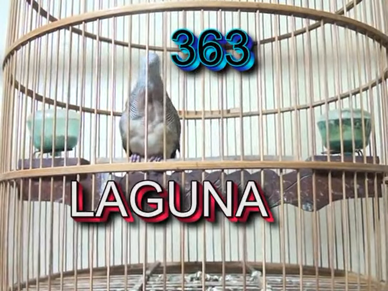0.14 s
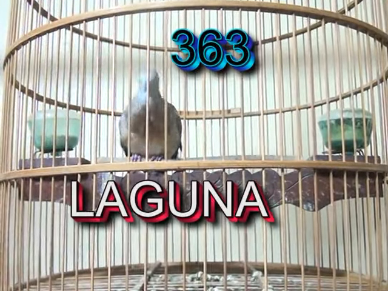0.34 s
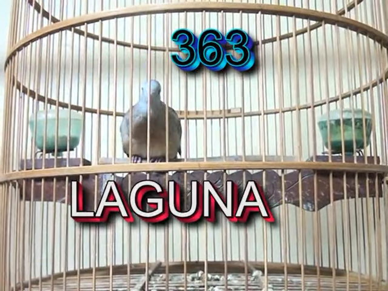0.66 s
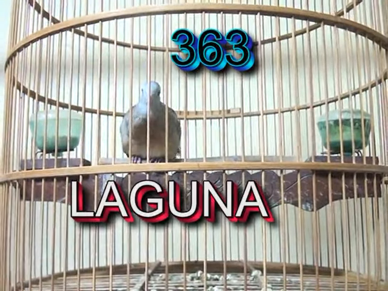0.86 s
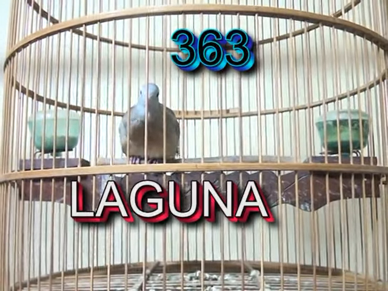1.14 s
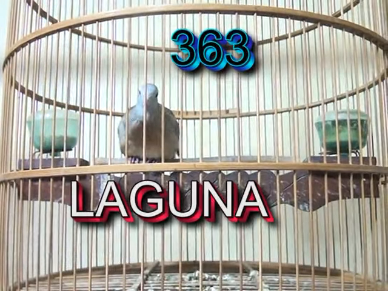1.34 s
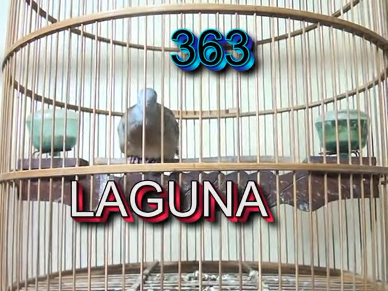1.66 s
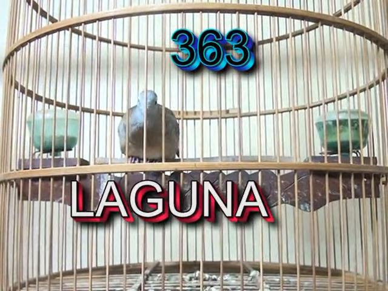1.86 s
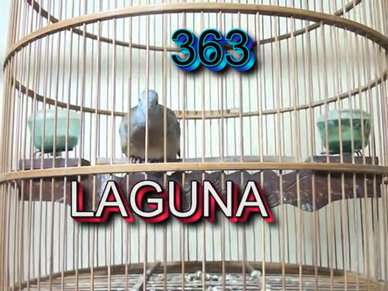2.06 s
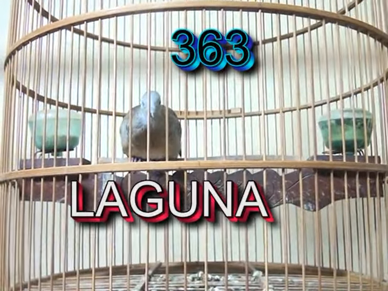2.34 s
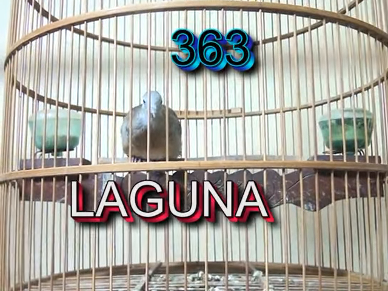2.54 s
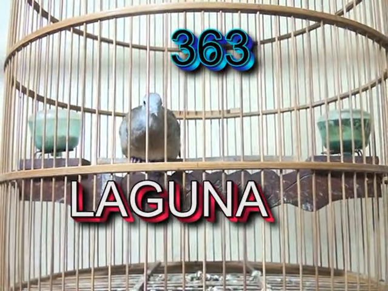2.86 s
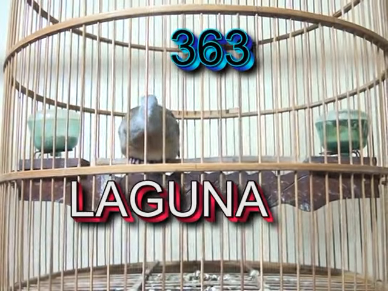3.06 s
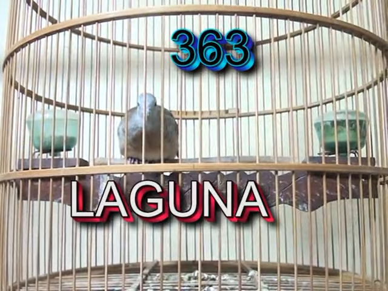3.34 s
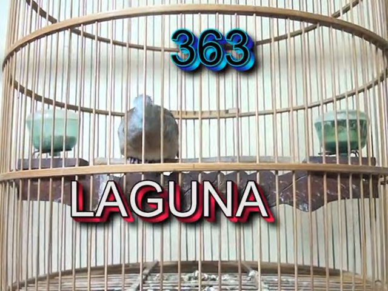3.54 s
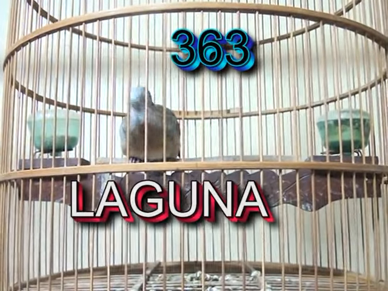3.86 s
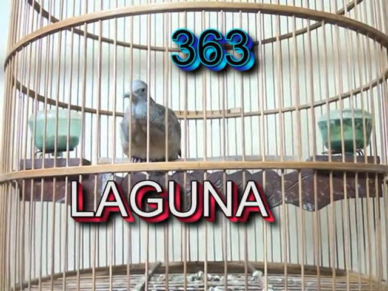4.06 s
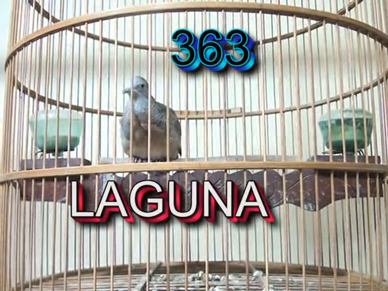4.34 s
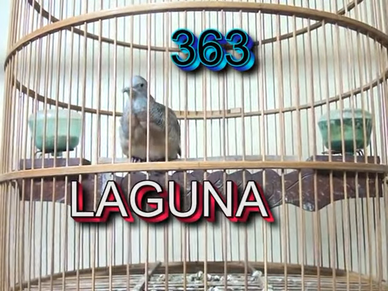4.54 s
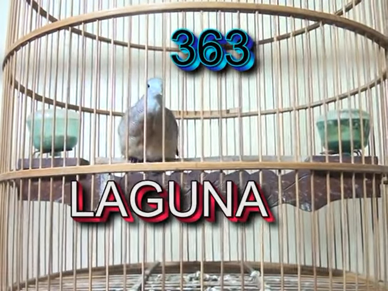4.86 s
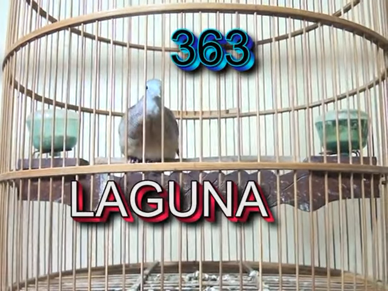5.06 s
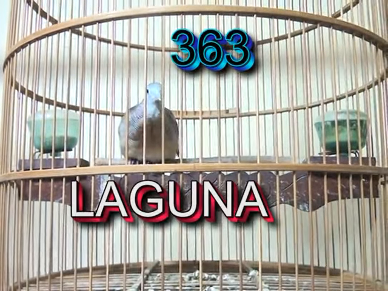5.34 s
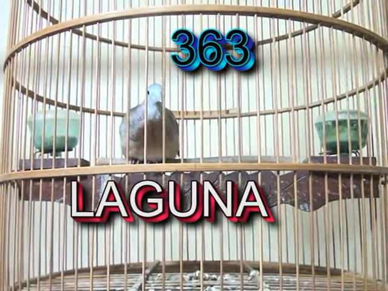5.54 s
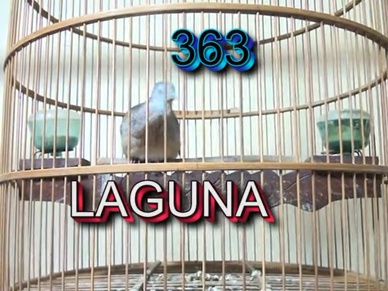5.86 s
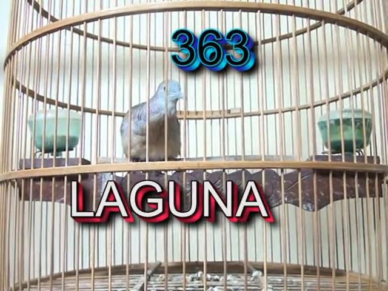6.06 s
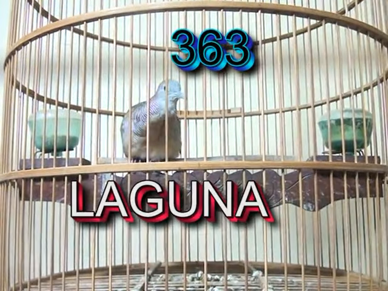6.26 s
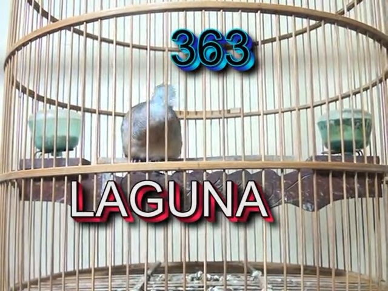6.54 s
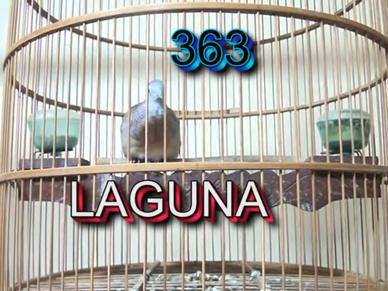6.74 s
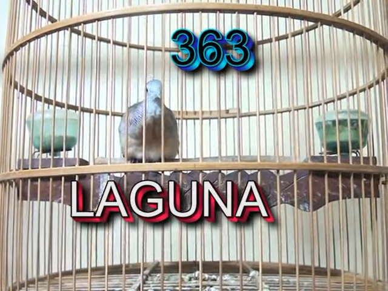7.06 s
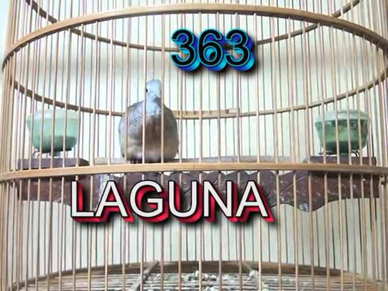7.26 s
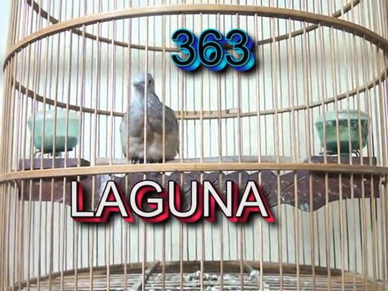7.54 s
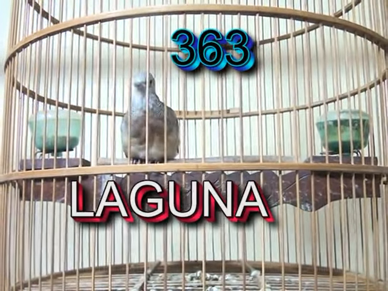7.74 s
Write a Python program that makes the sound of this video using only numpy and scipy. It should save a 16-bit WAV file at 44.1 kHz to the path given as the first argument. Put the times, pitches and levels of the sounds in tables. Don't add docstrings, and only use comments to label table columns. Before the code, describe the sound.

A small dove calls close to the microphone on a hard-walled porch. One note sweeps up and falls back, then seventeen short, round, nearly pure coos follow at a steady pace, slowing slightly and softening. A longer, weaker coo and a tiny cluck end it. Walls add quick echoes; behind are faint distant doves, low traffic rumble and a very faint high whine.

```python
import sys
import numpy as np
from scipy import signal
from scipy.fft import rfft, irfft, next_fast_len
from scipy.io import wavfile
from scipy.ndimage import uniform_filter1d, map_coordinates

SR = 44100
rng = np.random.default_rng(int(sys.argv[2]) if len(sys.argv) > 2 else 0)


def invert_db(x):
    u = np.asarray(x, float) / 20
    return 10 ** u


def wrap_up_sound(samples):
    columns = np.atleast_2d(samples).T
    tamed = np.clip(columns, -1, 1)
    steps = np.round(tamed * 32767).astype(np.int16)
    wavfile.write(sys.argv[1], SR, steps)


N = 348081

# time_s, pitch_hz, level_db
FIRST_NOTE = [
    (.457, 780, -21),
    (.465, 808, -17),
    (.5, 827.5, -12.5),
    (.535, 901, -11.5),
    (.558, 953, -12.5),
    (.572, 1077, -12.5),
    (.602, 1143, -13.5),
    (.662, 921.6, -12.5),
    (.68, 775, -22),
]
# start_s, length_s, top_pitch_hz, strength_db
SHORT_COOS = [(0.982, 0.066, 895.5, -8.5), (1.252, 0.077, 900.7, -8), (1.513, .079, 919, -7),
              (1.784, 0.086, 923, -6.5), (2.056, 0.091, 898, -7), (2.325, 0.089, 905.2, -7.5),
              (2.596, 0.1, 889.7, -7.5), (2.887, 0.1, 880, -7.5), (3.161, .099, 877, -7.5),
              (3.468, 0.1, 874.2, -7.5), (3.772, 0.11, 857.8, -8), (4.083, 0.11, 845, -8.5),
              (4.422, 0.11, 844, -9), (4.729, 0.12, 842, -10), (5.098, .14, 827.5, -9.5),
              (5.531, 0.13, 827.5, -10.5), (5.879, 0.13, 826, -12)]
# time_s, pitch_hz, level_db
LAST_NOTE = [
    (6.323, 790, -25.5),
    (6.331, 790, -17.5),
    (6.353, 811, -16.5),
    (6.393, 822, -13),
    (6.457, 810, -16.5),
    (6.52, 820, -18.5),
    (6.59, 828.6, -20),
    (6.66, 831.3, -18.5),
    (6.72, 874.5, -24),
]
# time_s, pitch_hz, level_db
CLUCK_NOTE = [
    (6.902, 877, -34.5),
    (6.908, 854, -23),
    (6.946, 836.5, -19),
    (6.953, 880, -30.5),
]
# pitch_hz, gain_db
NECK_PASS = [(760, -11), (830, -2.5), (865, 0), (885, -2), (900, -5), (920, -8.5)]
# partial_hz, level_db
SECOND_PARTIAL = [(1560, -38), (1660, -37.5), (1730, -43), (1800, -48), (1890, -38), (2100, -39),
                  (2270, -35)]
# partial_hz, level_db
THIRD_PARTIAL = [(2330, -47.5), (2470, -51.5), (2600, -47), (2700, -43), (2830, -38), (3100, -41.5),
                 (3400, -39.5)]
# partial_hz, gain_db
THROAT_PASS = [(2400, 5.5), (3300, -9), (4300, -13.5), (5200, -16.5), (5800, -13), (6250, -6.5),
               (6650, -10), (7000, -21.5), (9000, -30.5), (13000, -27.5)]
# top_pitch_hz, level_db
BRIGHTNESS = [(825, -53.5), (860, -51.5), (900, -44.5), (930, -43.5)]
# centre_hz, width_hz
AIR_SAC = (874, 510)
# freq_hz, density_db_per_hz
BREATH_SPECTRUM = [(600, -31), (1000, -5.5), (1350, 2.5), (2000, -10), (3500, -16.5), (6200, -16.5),
                   (9000, -17.5), (14000, -21.5)]
# time_s, spread_s, level_db
FEATHERS = (2.47, .04, -54)
# delay_ms, level_db
LEFT_ECHOES = [(-0.02, 1.5), (3.8, -25.6), (12.37, -12.8), (15.04, -27.9), (26.33, -34.1), (28.93, -20.1),
               (37.45, -23.6), (44.58, -18.1), (49.46, -28.6), (52.69, -21.0), (61.92, -14.6),
               (64.01, -30.3), (75.17, -22.1), (86.36, -30.8), (89.64, -25.6), (96.47, -28.5),
               (106.4, -20.5), (113.11, -32.0), (123.38, -33.8), (138.39, -25.9), (150.45, -31.8),
               (169.62, -31.6), (201.36, -34.1)]
# delay_ms, level_db
RIGHT_ECHOES = [(0.05, -0.2), (3.75, -18.8), (7.01, -12.8), (10.27, -23.2), (19.06, -25.8), (21.71, -16.2),
                (31.54, -18.5), (47.24, -29.3), (49.32, -15.5), (55.06, -18.3), (60.77, -11.8),
                (64.07, -21.4), (71.78, -24.7), (78.79, -17.8), (90.25, -22.6), (112.35, -28.7),
                (125.71, -27.7), (137.11, -22.6), (150.52, -27.9), (168.42, -28.4), (177.9, -32.6),
                (186.5, -30.5), (200.19, -31.7)]
# freq_hz, t60_s
PORCH_DECAY = [(500, 0.36), (1500, 0.65), (4000, 0.26), (10000, 0.14)]
# freq_hz, gain_db
TAIL_COLOUR = [(680, -1), (760, -2), (900, -2), (970, 6.5), (1700, 1.5), (2700, 8), (4000, -1),
               (9000, -4.5)]
# start_s, length_s, pitch_hz, glide_hz, level_db
FAR_CALLS = [(4.308, .11, 733, 5, -49), (4.497, 0.097, 721, -1.5, -44), (4.77, .2, 704, 14.5, -45.5),
             (5.04, .23, 720, -6.5, -40), (5.46, .4, 717, -31.5, -46.5), (7.09, 0.2, 681, -6, -55),
             (0.011, .055, 1250, -22, -51.5), (.26, .16, 831, 8, -57), (5.393, .11, 1336, -130, -63.5),
             (6.15, .1, 1210, 2, -51.5), (7.05, .4, 1169, -8, -64), (7.54, .08, 1246, -2, -52),
             (6.817, 0.051, 1132, -70, -37.5), (6.855, 0.048, 1064, -120, -31)]
# start_s, length_s, drone_hz, glide_hz, level_db
ENGINE_DRONES = [
    (.05, 0.33, 73.3, 1.5, -45.5),
    (.5, 0.63, 75, 2.5, -54),
    (2.95, 0.97, 57.16, 4.5, -48.5),
    (3.95, 0.66, 60.06, 0, -50),
    (3.75, 0.51, 80.7, 1.5, -53),
    (5.1, 0.48, 81, -2.5, -53),
    (5.85, .3, 100.7, 6.5, -55),
    (6, 0.4, 80.6, 1, -51),
    (7.55, 0.22, 58.2, 0, -48),
]
# time_s, level_db
TRAFFIC_SWELL = [
    (0.0, -56),
    (0.46, -54),
    (5.01, -56),
    (5.73, -51.5),
    (7.89, -58.5),
]
# freq_hz, density_db_per_hz
RUMBLE_SPECTRUM = [(12, -30.5), (22, 2.5), (33, -2.5), (42, -2), (59, 1), (75, -7.5), (100, -5.5),
                   (130, -12.5), (200, -21.5), (440, -120)]
# freq_hz, density_db_per_hz
AIR_SPECTRUM = [(65, -31.5), (110, -12), (289, -3), (370, -8.5), (410, -4), (606, -7.5), (686, -6),
                (730, -5.5), (1270, -7.5), (1660, -11.5), (2170, -13), (6320, -26.5), (15000, -26.5)]
# freq_hz, left_right_likeness
LIKENESS = [(30, .8), (70, .85), (140, .5), (280, .65), (900, .45), (2400, .45), (6500, .4), (6900, .9),
            (15000, .95)]
# freq_hz, level_db_rms
LINE_SCAN = [(11698, -80), (15125, -77), (15475, -80), (15525, -72), (15575, -71), (15625, -62),
             (15675, -72), (15725, -78)]


def unit(x):
    return x / np.sqrt(np.mean(x ** 2) + 1e-20)


def along(points, hz):
    f, v = np.transpose(points)
    return np.interp(np.log(hz + 1), np.log(f + 1), v)


def wobble(rate_hz, size):
    knots = rng.standard_normal(int(max(size, SR // 2) * rate_hz / SR) + 4)
    return map_coordinates(knots, [np.arange(size) * rate_hz / SR])


def note(rows, fade_s):
    s, *cols = np.transpose(rows)
    t = np.arange(s[0] - fade_s, s[-1] + fade_s, 1 / SR)
    edge_s = np.minimum(t - t[0], t[-1] - t)
    gate = np.sin(np.pi / 2 * np.clip(edge_s / (2 * fade_s), 0, 1)) ** 2
    return max(round(t[0] * SR), 0), gate, [np.interp(t, s, c) for c in cols]


def near_dove():
    out, effort = np.zeros(N + SR), np.zeros(N + SR)
    run = [(coo(*row), along(BRIGHTNESS, row[2])) for row in SHORT_COOS]
    notes = [(FIRST_NOTE, -47), *run, (LAST_NOTE, -53), (CLUCK_NOTE, -59.5)]
    for count, (rows, bright_db) in enumerate(notes):
        start, gate, (hz, db) = note(rows, fade_s=0.003)
        tone, push_db, strain = membrane(hz, db, bright_db, count)
        out[start:][:len(tone)] += np.sqrt(2) * gate * tone
        effort[start:][:len(tone)] = gate * invert_db(push_db + 1.5 * strain)

        run_up_s = .03 if count == 0 else 0.018 * np.exp(0.064 * rng.standard_normal())
        slaps = run_up(hz[0], run_up_s)
        fade_out = np.clip(np.arange(len(slaps))[::-1] / (.002 * SR), 0, 1)
        slaps *= invert_db(-18.5) * fade_out * (rows is not CLUCK_NOTE)
        out[start + SR // 300 - len(slaps):][:len(slaps)] += slaps
    air = breath()
    riding = invert_db(-0.5) * effort[:N] * unit(air)
    return out[:N] + (riding + rustle(air)) * invert_db(1.9 * wobble(70, N))


def coo(start_s, length_s, top_hz, strength_db):
    t = np.linspace(0, length_s, num=80)
    knee_hz, settle_s, fall_to_hz = 826, .018, 794.7
    low_hz = 784 - .4 * (top_hz - knee_hz)
    fall_s = .011 + .12 * length_s
    climb = np.clip(t / (length_s - fall_s), 0, 1)
    fall = np.clip(1 - (length_s - t) / fall_s, 0, 1) ** 1.9
    hz = knee_hz - (knee_hz - low_hz) * np.exp(-t / settle_s)
    hz += (top_hz - knee_hz) * climb - (top_hz - fall_to_hz) * fall

    attack_db = 5 * np.exp(-t / 0.0017)
    release_db = 8 * np.exp((t - length_s) / .004)
    spent_db = 1 * max(top_hz - 913, 0) * fall
    db = strength_db + along(NECK_PASS, hz) - (attack_db + release_db) - spent_db
    return np.transpose([start_s + t, hz, db])


def membrane(hz, db, bright_db, count):
    size = len(hz)
    phase = 2 * np.pi * np.cumsum(hz * (1 + .0004 * wobble(60, size))) / SR
    strain = np.clip((hz - 920) / 150, 0, 1)
    flutter = 1 + .45 * strain * wobble(400, size)
    sway = 1 + .36 * strain * wobble(160, size)
    tone = invert_db(db) * (1 + invert_db(-43.5) * wobble(900, size)) * sway * np.sin(phase)

    swell_db = 0.42 * (db - np.max(db))
    second_db = along(SECOND_PARTIAL, 2 * hz) + swell_db
    third_db = along(THIRD_PARTIAL, 3 * hz) + swell_db + 0.42 * (np.max(db) + 9.5)
    tone += flutter * invert_db(second_db) * np.sin(2 * phase + 1)
    tone += flutter * invert_db(third_db) * np.sin(3 * phase + 2)

    opening_db = (1 + 0.49 * count) * np.exp(-np.arange(size) / SR / 0.025)
    push_db = bright_db + 0.58 * (db - np.max(db)) + opening_db + 3 * strain
    shake = .11 * strain * wobble(250, size)
    for k in range(4, 15):
        rough = (flutter + .35 * wobble(350, size)) * invert_db(2.9 * wobble(50, size))
        level_db = push_db + strain * (25.5 - 5.1 * k) + along(THROAT_PASS, k * hz)
        tone += rough * invert_db(level_db) * np.sin(k * (phase + shake) + k)
    return tone, push_db, strain


def run_up(pitch_hz, length_s):
    u = np.linspace(0, 1, round(length_s * SR))
    hz = (105 + (pitch_hz - 105) * u ** 4) * (1 + 0.092 * wobble(300, len(u)))
    phase = 2 * np.pi * np.cumsum(hz) / SR
    slaps = np.zeros(len(u))
    for k in range(1, 20):
        slaps += air_sac(k * hz) * hz / pitch_hz * np.sin(k * (phase - phase[-1]))
    return slaps * np.clip(u * 8, 0, 1) * invert_db(-8 * (1 - u))


def air_sac(hz):
    centre_hz, width_hz = AIR_SAC
    damping = (hz * width_hz) ** 2
    return damping / ((centre_hz ** 2 - hz ** 2) ** 2 + damping) / (1 + (hz / 1600) ** 8)


def breath():
    m = next_fast_len(N)
    gain = invert_db(along(BREATH_SPECTRUM, np.fft.rfftfreq(m, 1 / SR)))
    return irfft(rfft(rng.standard_normal(m)) * gain, m)[:N]


def rustle(air):
    time_s, spread_s, level_db = FEATHERS
    burst = np.exp(-((np.arange(N) / SR - time_s) / spread_s) ** 2)
    return invert_db(level_db) * burst * unit(np.diff(air, prepend=0))


def porch(x, diffuse_db):
    hz, t, z = signal.stft(rng.standard_normal((2, SR // 2)), SR, nperseg=512)
    decay_db = 60 * t / along(PORCH_DECAY, hz)[:, None]
    tail = signal.istft(z * invert_db(along(TAIL_COLOUR, hz)[:, None] - decay_db), SR, nperseg=512)[1]
    tail = tail * (1 - np.exp(-np.arange(tail.shape[1]) / SR / .03))
    response = invert_db(diffuse_db) * tail / np.linalg.norm(tail, axis=1, keepdims=True)
    dull = np.hanning(9) / 4
    for side, (direct, *echoes) in enumerate((LEFT_ECHOES, RIGHT_ECHOES)):
        direct_ms, direct_db = direct
        response[side, 1 + int(direct_ms * SR / 1000)] += invert_db(direct_db)
        for delay_ms, level_db in echoes:
            response[side, round(delay_ms * SR / 1000) - 3:][:9] += invert_db(level_db) * dull
    return signal.fftconvolve(x[None], response, axes=1)[:, 1:N + 1]


def far_doves():
    return glides(FAR_CALLS, fade_s=.018, sag_db=2.5)


def glides(calls, fade_s, sag_db):
    out = np.zeros(N + SR)
    for start_s, length_s, pitch_hz, glide_hz, level_db in calls:
        begin = (start_s, pitch_hz, level_db)
        end = (start_s + length_s, pitch_hz + glide_hz, level_db - sag_db)
        start, gate, (hz, db) = note([begin, end], fade_s)
        level = np.sqrt(2) * gate * invert_db(db + 1.4 * wobble(21, len(hz)))
        out[start:][:len(hz)] += level * np.sin(2 * np.pi * np.cumsum(hz) / SR)
    return out[:N]


def street():
    s, db = np.transpose(TRAFFIC_SWELL)
    swell = invert_db(np.interp(np.arange(N) / SR, s, db) + 7.5 + 0.93 * wobble(4.1, N))
    drones = glides(ENGINE_DRONES, fade_s=.05, sag_db=1.5)
    drift_db = .4 * wobble(1.5, N)
    wash = rush(AIR_SPECTRUM, patchy_db=.8)
    rumble = rush(RUMBLE_SPECTRUM, patchy_db=.9)
    return swell * rumble + drones + invert_db(-46 + drift_db) * wash


def rush(spectrum, patchy_db):
    z = signal.stft(rng.standard_normal((2, N + SR // 2)), nperseg=512)[2]
    field = uniform_filter1d(rng.standard_normal(z.shape[1:]), 5, 0)
    field = uniform_filter1d(field, 12, 1)
    pair = signal.istft(z * invert_db(patchy_db * unit(field)), nperseg=512)[1]
    m = next_fast_len(pair.shape[1])
    hz = np.fft.rfftfreq(m, 1 / SR)
    turn = np.arccos(np.clip(along(LIKENESS, hz), -1, 1)) / 2
    shaped = rfft(pair, m) * invert_db(along(spectrum, hz))
    mid, side = irfft(shaped * [np.cos(turn), np.sin(turn)], m)[:, :N]
    return unit(np.array([mid + side, mid - side]))


def whistle():
    t = np.arange(N) / SR
    out = np.zeros(N)
    for hz, db in LINE_SCAN:
        level = np.sqrt(2) * invert_db(db + 1.8 * wobble(14, N))
        out += level * np.cos(2 * np.pi * hz * t + .4 * wobble(9, N))
    return out


def scene():
    return porch(near_dove(), diffuse_db=-15.5) + porch(far_doves(), diffuse_db=-11) + street()


def band_limit(x):
    return signal.sosfilt(signal.butter(12, 16790, fs=SR, output="sos"), x)


def record(dry):
    top_hz, wide_hz, narrow_db = 15790, 6900, -8
    m = next_fast_len(N)
    hz = np.fft.rfftfreq(m, 1 / SR)
    left, right = rfft(dry + whistle(), m) * (hz < top_hz)
    mid = (left + right) / 2
    side = (left - right) / 2 * invert_db(narrow_db * (hz > wide_hz))
    mix = irfft([mid + side, mid - side], m)[:, :N]
    return band_limit(mix)


dry = scene()
out = record(dry)
wrap_up_sound(out)
```